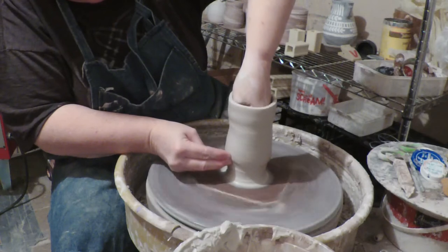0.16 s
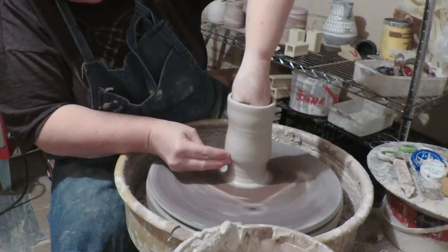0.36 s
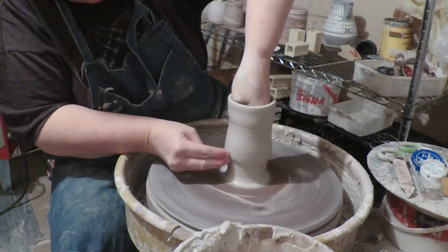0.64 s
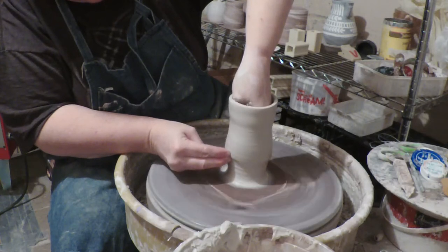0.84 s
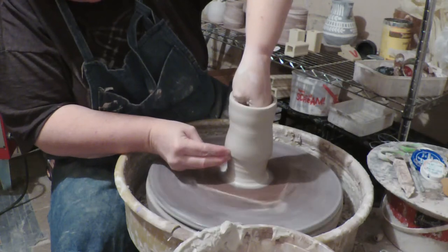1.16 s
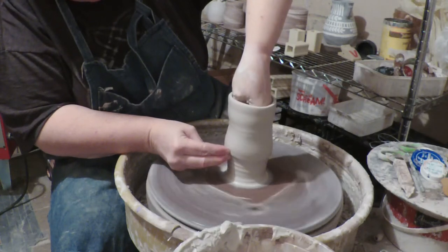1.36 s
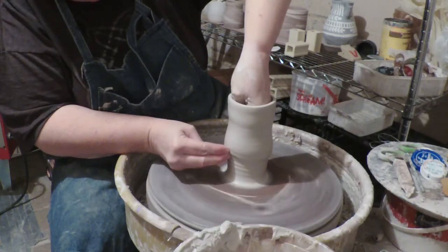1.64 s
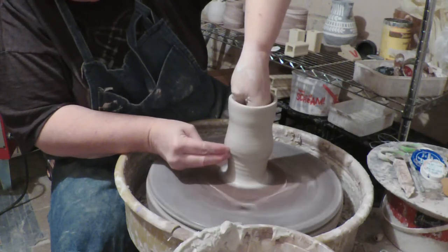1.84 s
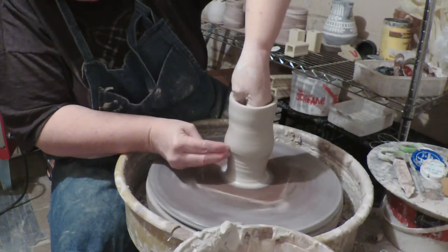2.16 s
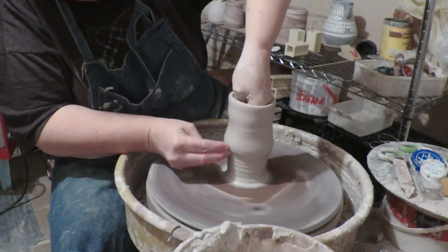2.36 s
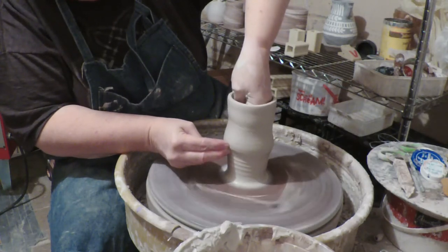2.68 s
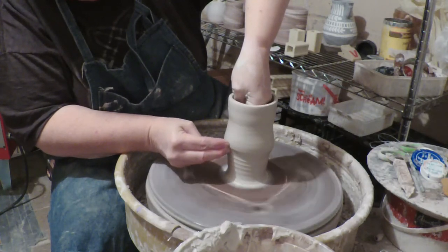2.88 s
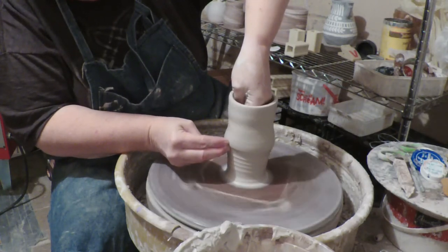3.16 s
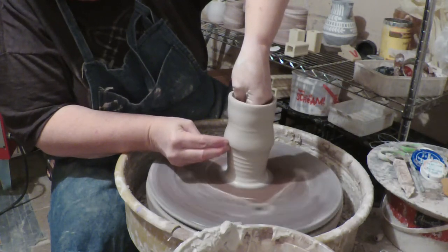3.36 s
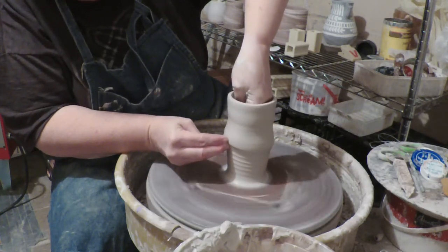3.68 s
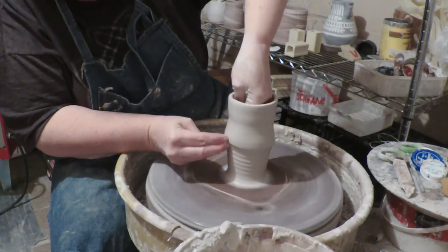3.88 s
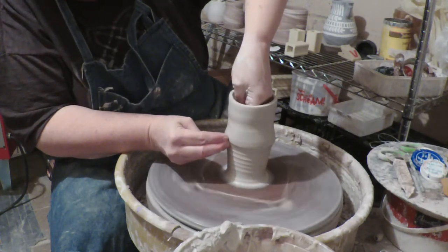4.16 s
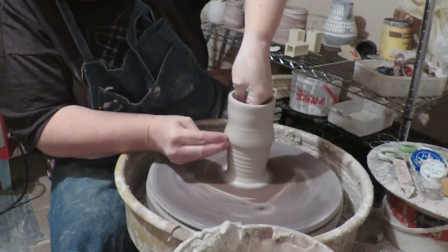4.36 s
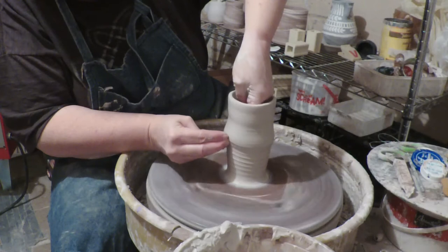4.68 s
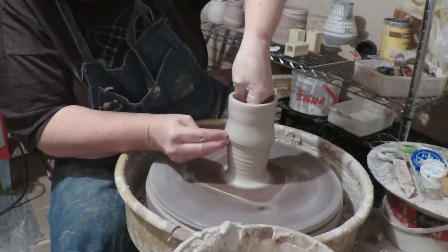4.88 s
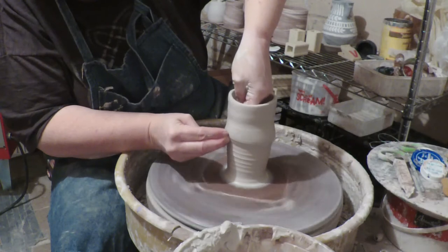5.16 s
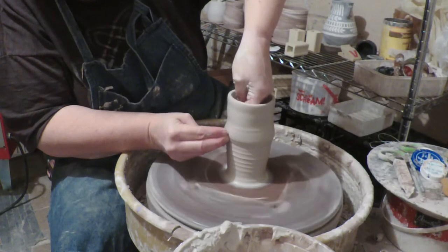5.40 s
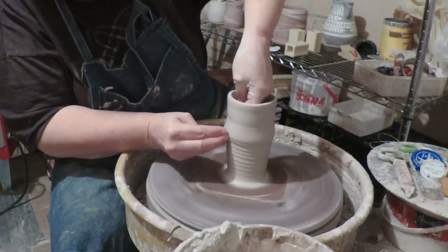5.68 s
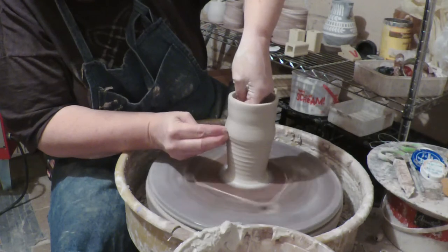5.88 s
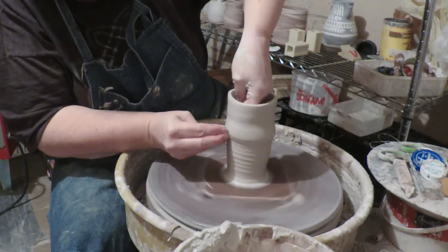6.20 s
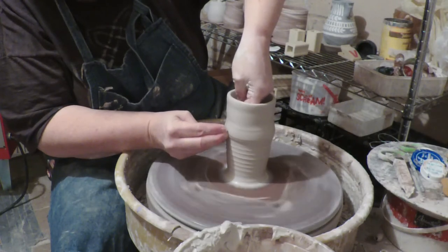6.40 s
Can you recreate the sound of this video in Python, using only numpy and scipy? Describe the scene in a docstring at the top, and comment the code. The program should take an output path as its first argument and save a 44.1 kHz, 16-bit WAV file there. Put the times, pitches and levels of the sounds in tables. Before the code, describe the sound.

An electric pottery wheel runs at constant speed in a small workshop, heard close in stereo. A smooth low mains hum dominates, with mid-pitched motor tones that flutter gently and sway about once a second. Dry brush and bearing rattle ticks quietly around nine times a second beneath a thin high whine. Soft rumble and hiss sit behind. Just after five seconds, two very faint wet finger scuffs touch the clay.

```python
"""A steady motor hum fills a small workshop: an electric pottery wheel, heard by a pair of microphones.
Rectified mains makes the motor hum at multiples of the ripple, and a thin whine sits high above it.
The commutator adds its own tones, which mix with the ripple. Brushes and bearings rattle in the housing,
partly in a pattern that repeats every motor turn. Two short scuffs are wet fingers on the clay.
Noise shaped separately for each microphone lays the room's rumble and hiss behind."""
import sys
import numpy as np
from scipy import signal
from scipy.fft import rfft, irfft, next_fast_len
from scipy.io import wavfile

SR = 44100
rng = np.random.default_rng(int(sys.argv[2]) if len(sys.argv) > 2 else 0)


def dump(signal):
    """Clip the signal to [-1, 1] and save it as 16-bit WAV at the path in sys.argv[1]."""
    limited = np.clip(np.atleast_2d(signal).T, -1, 1)
    pcm = np.round(limited * 32767).astype(np.int16)
    wavfile.write(sys.argv[1], SR, pcm)


N = 288458
T = np.arange(N) / SR   # time in seconds

# Room air and microphone hiss. Each row: frequency in Hz, left level in dB per Hz,
# right level in dB per Hz, likeness of the two microphones from -1 to 1.
AIR_COLOUR = [(20.5, -79, -77.5, 1), (31, -74.5, -75.5, 0.73), (48, -80.5, -88, 0.34),
              (85, -81.5, -78, -0.38), (169, -81.5, -82, 0.25), (271, -78, -81.5, 0.01),
              (574, -88.5, -84.5, 0.85), (1140, -90.5, -90.5, 0.25), (1740, -96, -96, 0.54),
              (2380, -94.5, -91, 0.49), (3300, -101, -99, 0.45), (6230, -104, -103, 0.0046),
              (10740, -105, -104, -0.02), (14800, -111, -111, 0.14)]
# Wet fingers scuffing the clay. Each row: middle of the scuff in seconds, peak level in dB.
SCUFFS = [(5.19, -62), (5.34, -59)]
# Resonances of the housing. Each row: frequency in Hz, width in Hz, level in dB, left minus right in dB,
# likeness of the two microphones from 0 to 1, share of power that repeats every turn from 0 to 1.
HOUSING_MODES = [(349, 58, -60, -18, 0.2, 0.04), (436, 55, -61, 1, 0.9, 0.05),
                 (502.5, 19, -65, -9.5, 0.6, 0.6), (864.6, 19, -63, 7.5, 0.6, 0.02),
                 (1027, 36, -74, -2.5, 0.3, 0.4), (1483, 28, -71.5, -6, 1, 0.2),
                 (1464, 106, -70, -0.5, 0.15, 0), (1945, 53, -74.5, -8, 0.2, 0.1),
                 (2155, 220, -78, -5, .4, 0.3), (2452, 76, -68, -1.5, 0.6, .6),
                 (2726, 230, -72, -3, 0.9, 0), (3520, 100, -75.5, -5, 0.4, 0),
                 (3936, 100, -72, 0, 0.6, 0.01), (4327, 460, -65, -4.5, 0.5, .01),
                 (4345, 58, -67.5, -3, 0.6, 0.02), (4640, 83, -70, 4, 0.5, 0.14),
                 (4980, 660, -75, -6, 0.5, 0.12), (7560, 1000, -73, -7, 0.4, 0),
                 (8190, 95, -77, -1, 0.5, .01), (8650, 790, -73.5, -4, 0.3, 0.1),
                 (11500, 5300, -81.5, -3, .3, .01)]
# Rough and smooth places under the brushes. Each row: place in the turn from 0 to 1, length in turns,
# most stirred frequency in Hz, reach in octaves, change in dB.
BRUSH_TRACK = [(.05, .24, 5500, 1.1, -8.5), (.21, .045, 8750, .12, 13), (.215, .06, 4640, .04, 12),
               (.29, .03, 6600, .5, 8), (.38, .08, 4320, .06, 3), (.52, .07, 6000, .9, 5),
               (.63, .1, 4100, .15, 4), (.75, .05, 6000, .8, 5), (.1, .06, 2450, .08, 4),
               (.34, .06, 2450, .08, 4), (.7, .1, 2450, .08, 5), (.57, .12, 2450, .08, -5)]
# Close turn multiples picked out by one housing mode. Each row: multiple of the turn rate,
# relative left level in dB, relative right level in dB, lead of the left in radians.
THROB_LINES = [(92, -4.5, -5.5, -1.0), (94, -0.1, -2.0, -0.9), (96, -10, -11, -0.8)]
# Commutator tones. Each row: multiple of the ripple, added multiple of the turn rate,
# left level in dB, right level in dB, lead of the left in radians.
ROTATION_LINES = [(-1, 16, -66.2, -84.3, -0.2), (0, 16, -66.3, -64.4, -0.3), (0, 32, -51.7, -46.6, -0.7),
                  (0, 33, -65.2, -60.3, -0.8), (0, 35, -70.9, -65.0, 0.8), (0, 46, -83.8, -68.3, -2.9),
                  (0, 47, -67.2, -70.1, -1.8), (0, 48, -58.0, -56.5, -2.4), (0, 49, -66.6, -74.3, -2.4),
                  (0, 53, -75.3, -68.1, 0.7), (0, 160, -72.6, -72.9, -0.1), (1, -1, -69.3, -68.1, -2.9),
                  (1, 16, -59.0, -58.4, 0.6), (1, 32, -67.2, -67.3, -1.8), (2, -16, -68.8, -70.7, 2.7),
                  (2, 2, -70.8, -65.8, 0.3), (2, 16, -64.5, -75.2, -0.2), (3, -16, -87.2, -69.0, 1.5),
                  (3, -4, -68.3, -66.8, 0.4), (3, -2, -78.2, -61.6, -1.4), (3, -1, -71.5, -64.2, 0.8),
                  (3, 1, -68.9, -61.1, 0.0), (3, 2, -85.6, -63.6, 0.5), (3, 16, -66.0, -59.6, 0.0),
                  (3, 32, -78.4, -68.5, 0.8), (4, -16, -70.9, -60.4, 0.2), (4, -1, -69.9, -92.4, 2.6),
                  (4, 1, -68.1, -67.9, -1.3), (4, 2, -65.2, -61.7, 0.3), (5, -16, -69.6, -71.1, -1.7),
                  (6, -2, -74.6, -70.3, 0.5)]
# Thin steady whine. Its one row: frequency in Hz, left level in dB, right level in dB.
WHINE_LINE = (8271.7, -80, -76)
# Magnetic hum. Each row: multiple of the ripple, left level in dB, right level in dB,
# lead of the left in radians.
HUM_LINES = [(0.5, -64.9, -69.8, 1.0), (1, -57.4, -60.9, -2.8), (2, -38.6, -32.3, 1.9),
             (2.5, -67.1, -58.9, -0.6), (3, -49.0, -25.9, 1.4), (4, -49.7, -55.9, -0.4),
             (5, -54.9, -49.6, -0.3), (6, -59.2, -66.9, -0.9), (7, -72.9, -82.9, -0.4),
             (8, -73.4, -72.7, 0.0), (9, -78.5, -62.3, 0.1), (10, -78.7, -76.5, 1.2),
             (11, -77.7, -71.5, 0.1), (17, -78.3, -72.3, 0.9), (18, -83.6, -72.9, -0.2),
             (19, -75.0, -73.4, -0.9), (20, -76.7, -78.8, 0.2), (22, -76.6, -68.6, -0.6),
             (23, -68.7, -62.1, -0.3), (24, -76.1, -69.8, -1.4)]
# Hum line thrown to and fro by the turning wheel head. Its one row: multiple of the ripple,
# left level in dB, right level in dB, lead of the left in radians, lag in radians.
HEAD_LINE = (3, -51.3, -48.9, .6, 1.0)

TURN_HZ = 9.321   # mean motor turns per second
WHEEL_HZ, WHEEL_START_RAD = 1.0, .25   # the wheel head turns once a second
# shares of the motor speed: swing once a wheel turn, and chance wander
SPEED_SWAY, SPEED_LEAD_RAD, SPEED_WANDER = .0016, .4, .0007

SLIDE_S, SLIDE_HZ, SLIDE_WIDTH_HZ = .085, 1110, 150
RATTLE_WAVER_DB, GRIT_DB = 1.05, 0.14
THROB_DB, THROB_SWAY_DB, THROB_WANDER_DB = -56, -1.0, 1.5   # mean level, swing per wheel turn, chance
THROB_SLIP_RAD = 0.65
ROTATION_WAVER_DB = .12   # grows with the root of the turn multiple

RIPPLE_HZ, RIPPLE_LAG_S = 120.03, .00274
HUM_START_RAD = 5.0
HUM_SPREAD_RAD = .55   # phase that grows with the square of the multiple and blunts the ripple pulse
FRAME_MODE_HZ = 540   # above this mode the frame swings against the force
HUM_WAVER_DB, HUM_TREND_DB_PER_S = .07, -.02   # the waver grows with the root of the multiple
CUTOFF_HZ = 15200


def from_db(db):
    """Decibels to gain."""
    return 10 ** (np.asarray(db) / 20)


def rms_one(x):
    """Scale to rms 1."""
    return x / np.sqrt(np.mean(x ** 2) + 1e-20)


def drift(rate_hz):
    """Slow chance of spread 1: noise at every 40th sample through a double one-pole low-pass."""
    step = 40
    r = np.exp(-2 * np.pi * rate_hz * step / SR)
    noise = rng.standard_normal(N // step + 2002)
    slow = signal.lfilter([1], [1, -2 * r, r * r], noise)[2000:]   # drop the filter's settling
    slow = rms_one(slow - slow.mean())
    return np.interp(np.arange(N) / step, np.arange(len(slow)), slow)


def pair(mid, side, alike):
    """Left and right microphones with the given likeness, from two unrelated signals."""
    alike = np.clip(alike, -1, 1)
    shared = np.sqrt(1 + alike) * mid
    opposed = np.sqrt(1 - alike) * side
    return np.array([shared + opposed, shared - opposed]) / np.sqrt(2)


def resonate(x, hz, width_hz):
    """A resonance applied twice, for dark valleys beside it, scaled to rms 1."""
    r = np.exp(-np.pi * width_hz / SR)
    stage = [1, 0, -1, 1, -2 * r * np.cos(2 * np.pi * hz / SR), r * r]
    return rms_one(signal.sosfilt([stage, stage], x))


def tone(angle, left_db, right_db, lead):
    """One line, reaching each microphone with its own level and phase."""
    left = from_db(left_db) * np.sin(angle + lead)
    right = from_db(right_db) * np.sin(angle)
    return np.sqrt(2) * np.array([left, right])


def wheel(lead=0):
    """What comes round once per wheel turn, from -1 to 1."""
    return np.cos(2 * np.pi * WHEEL_HZ * T + WHEEL_START_RAD + lead)


def motor_turns():
    """Running count of motor turns; the uneven clay speeds and slows the motor on each wheel turn."""
    speed = 1 + SPEED_SWAY * wheel(SPEED_LEAD_RAD) + SPEED_WANDER * drift(2)
    return np.cumsum(TURN_HZ * speed) / SR


def air():
    """Room rumble and hiss: smooth noise with a colour per microphone and a likeness set by frequency."""
    size = next_fast_len(N)
    log_hz = np.log(np.maximum(np.arange(size // 2 + 1) * SR / size, 1))
    points, left, right, alike = np.transpose(AIR_COLOUR)
    log_points = np.log(points)
    levels_db = [np.interp(log_hz, log_points, level) for level in (left, right)]
    colour = from_db(levels_db) * np.sqrt(SR / 2)   # dB per Hz to gain on white noise
    mid, side = rfft(rng.standard_normal((2, size)))
    both = pair(mid, side, np.interp(log_hz, log_points, alike))
    return irfft(both * colour, size)[:, :N]


def slides():
    """Wet fingers on clay: short smooth swells of resonant noise, the same at both microphones."""
    swell = sum(from_db(db) * np.exp(-((T - middle) / (SLIDE_S / 2)) ** 4) for middle, db in SCUFFS)
    return swell * resonate(rng.standard_normal(N), SLIDE_HZ, SLIDE_WIDTH_HZ)


def rattle(turns):
    """Gritty brush noise rings in the housing, shaded by the rough and smooth places of the track."""
    # two sets of grit, taken by alternate modes
    fresh = rng.standard_normal((2, 2, N)) * from_db(GRIT_DB * drift(47))
    surface = rng.standard_normal((2, 4730))   # one turn of wear marks, met again on every turn
    worn = surface[:, (turns % 1 * surface.shape[1]).astype(int)]
    places = []
    for at, length, *_ in BRUSH_TRACK:
        distance = (turns - at + .5) % 1 - .5   # in turns, the short way round
        places.append(np.exp(-(distance / (length / 2)) ** 4))
    out, load = 0, drift(4.4)   # the load is common to all modes
    for k, (hz, width_hz, db, pan_db, alike, repeat) in enumerate(HOUSING_MODES):
        stir_db = 0
        for place, (_, _, centre_hz, reach, gain_db) in zip(places, BRUSH_TRACK):
            nearness = np.exp(-(np.log2(hz / centre_hz) / reach) ** 2)
            stir_db = stir_db + place * gain_db * nearness
        repeat = np.clip(repeat, 0, 1)
        rub = np.sqrt(repeat) * worn + np.sqrt(1 - repeat) * fresh[k % 2]
        waver_db = RATTLE_WAVER_DB * (load + 0.73 * drift(7.8))
        mid, side = resonate(rub * from_db(stir_db + waver_db), hz, width_hz)
        pan = from_db([[pan_db / 2], [-pan_db / 2]])
        out = out + from_db(db) * pair(mid, side, alike) * pan
    return out


def throb(turns):
    """Multiples two apart keep nearly in step, so their tone beats twice a turn; they slip mostly together."""
    slip, tones = THROB_SLIP_RAD * drift(2.6), 0
    for k, left, right, lead in THROB_LINES:
        own_slip = 0.45 * drift(5.0)
        tones = tones + tone(2 * np.pi * k * turns + slip + own_slip, left, right, lead)
    level_db = THROB_DB + THROB_SWAY_DB * wheel(.5) + THROB_WANDER_DB * drift(1.2)
    return from_db(level_db) * rms_one(tones)


def rotation(turns):
    """Commutator tones at sums and differences of ripple and rotation; they follow the motor speed."""
    out, starts = 0, rng.random(len(ROTATION_LINES))
    for (m, k, left, right, lead), start in zip(ROTATION_LINES, starts):
        angle = 2 * np.pi * (m * RIPPLE_HZ * T + k * turns + start)
        level = from_db(ROTATION_WAVER_DB * np.sqrt(abs(k)) * drift(2.7))
        out = out + level * tone(angle, left, right, lead)
    return out


def whine():
    """One thin line, steady in pitch and level."""
    hz, left, right = WHINE_LINE
    return tone(2 * np.pi * hz * T, left, right, lead=-1.3)


def ripple(k):
    """Running phase of one multiple of the ripple, turned over above the frame mode."""
    running = 2 * np.pi * k * RIPPLE_HZ * (T - RIPPLE_LAG_S)
    frame_flip = np.pi * (k * RIPPLE_HZ > FRAME_MODE_HZ)
    return running + HUM_START_RAD + HUM_SPREAD_RAD * k * k + frame_flip


def hum():
    """Magnetic pull: clean lines on the ripple, the higher ones wavering more, one swayed by the wheel head."""
    out, trend_db = 0, HUM_TREND_DB_PER_S * (T - T.mean())
    for k, left, right, lead in HUM_LINES:
        level = from_db(trend_db + HUM_WAVER_DB * np.sqrt(k) * drift(2.0))
        out = out + level * tone(ripple(k), left, right, lead)
    k, left, right, lead, lag = HEAD_LINE
    return out + wheel() * tone(ripple(k) - lag, left, right, lead)


def scene():
    """The room first, then hands, housing and motor."""
    turns = motor_turns()
    return air() + slides() + rattle(turns) + throb(turns) + rotation(turns) + whine() + hum()


def record(dry):
    """A steep elliptic low-pass cuts the top of both microphones."""
    low_pass = signal.ellip(14, .02, 60, CUTOFF_HZ, fs=SR, output="sos")   # order, ripple dB, stop dB
    return signal.sosfilt(low_pass, dry)


dry = scene()
out = record(dry)
dump(out)
```